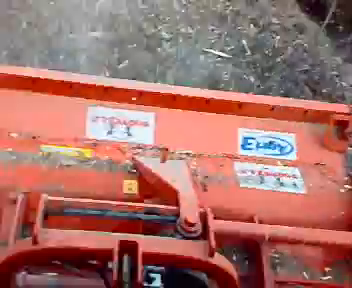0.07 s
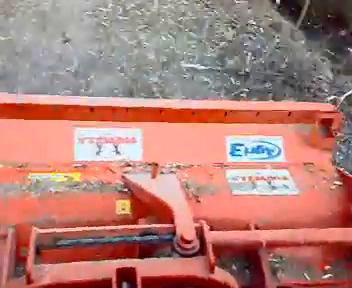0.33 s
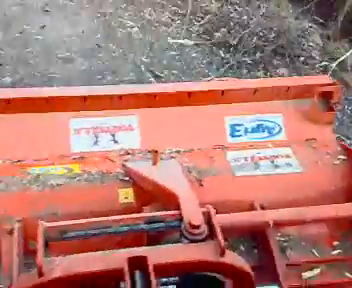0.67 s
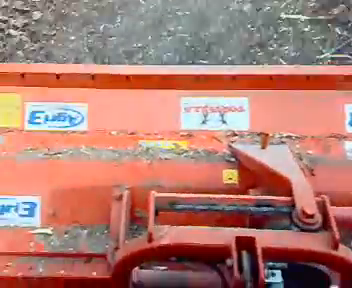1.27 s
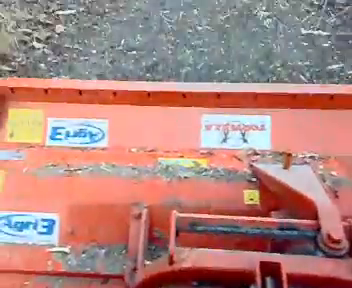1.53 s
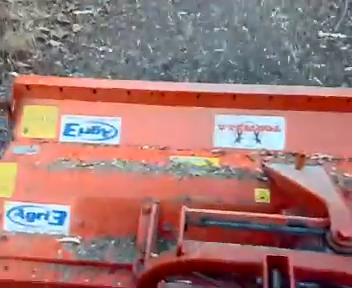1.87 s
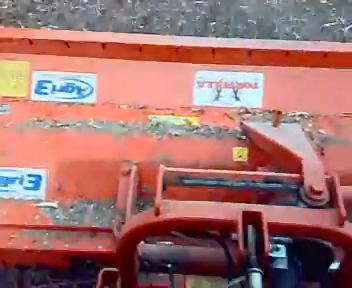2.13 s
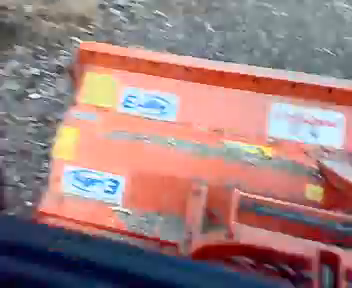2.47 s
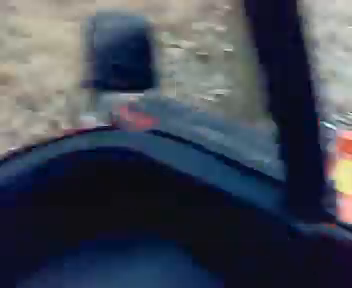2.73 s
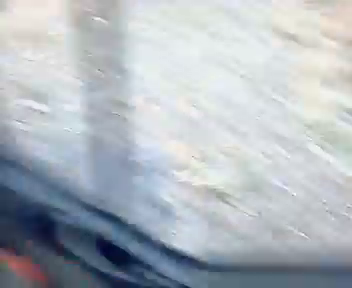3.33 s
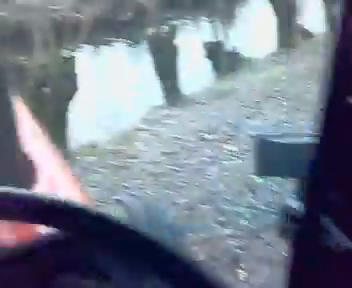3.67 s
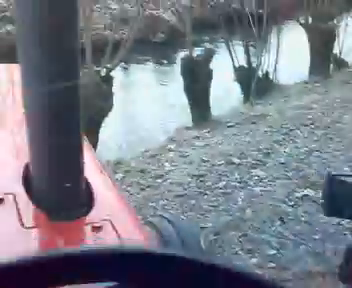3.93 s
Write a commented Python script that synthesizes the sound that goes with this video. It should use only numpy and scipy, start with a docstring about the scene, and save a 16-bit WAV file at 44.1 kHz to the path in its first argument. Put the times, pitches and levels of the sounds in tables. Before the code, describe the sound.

Heard inside a tractor cab, a flail mulcher shreds wood with harsh crunches, cracks and a hail of chips on steel, above the steady diesel engine. Toward the end the mulcher recedes and the engine's deep hum grows.

```python
"""In the cab of a tractor driving a flail mulcher through cut branches.
The rotor's flails drone over the diesel engine while a hail of chips rattles the steel hood.
Thick limbs are chopped, branches snap, chunks ping, a branch knocks and one flail rings.
Near the end the mulcher fades and the cab boom swells as the microphone turns into the cab.
The loud stretches overload it."""
import sys
import numpy as np
from scipy import signal
from scipy.fft import rfft, irfft
from scipy.io import wavfile
from scipy.ndimage import uniform_filter1d

SR = 44100
rng = np.random.default_rng(int(sys.argv[2]) if len(sys.argv) > 2 else 0)


def log_audio(samples):
    """Write samples as a 16-bit WAV file to the path given in sys.argv[1]."""
    # one column per channel
    frames = np.atleast_2d(samples).T
    # limit to full scale, then quantise
    limited = np.clip(frames, -1, 1)
    pcm = np.round(limited * 32767).astype(np.int16)
    wavfile.write(sys.argv[1], SR, pcm)


N = 176400
T = np.arange(N) / SR

# rotor speed, sagging under load (time [s], speed [turns/s])
ROTOR_SPEED = [(0, 32.19), (0.3, 32.39), (0.6, 32.74), (0.9, 32.87), (1.7, 33.06), (1.84, 32.47),
               (1.95, 32.79), (2.08, 32.71), (2.5, 33.05), (3.0, 33.37), (3.35, 33.34), (3.65, 33.63)]
# drone of the flails (time [s], flail-passing tone [dB], its octave [dB])
DRONE_LEVELS = [(0, -14.5, -21), (.11, -18, -22), (.2, -15.5, -16.5), (.44, -14.5, -18), (.6, -12.3, -12),
                (1.2, -12.8, -12.7), (1.47, -11, -13.3), (1.8, -13.2, -12.3), (2.0, -11.3, -12.5),
                (2.45, -10.3, -11), (2.72, -12.2, -13.2), (2.85, -11, -21), (3.05, -11, -26),
                (3.25, -20, -27), (3.65, -18.5, -38), (3.8, -30, -29), (4, -34, -34)]
# colour of the air churned by the rotor (frequency [Hz], relative level [dB])
CHURN_COLOUR = [(20, -20), (60, -16), (120, 0.5), (160, -6.5), (260, -4), (340, 3.5), (600, -3.5),
                (1300, -4.5), (2400, -12.5), (7500, -19)]
# fader of the churning air (time [s], level [dB])
CHURN_LEVEL = [(0, -18), (2.2, -14), (2.7, -15.5), (3.2, -22), (4, -30.5)]
# colour of the engine in the cab (frequency [Hz], relative level [dB])
ENGINE_COLOUR = [(25, -17), (60, -2.5), (125, 1), (220, -1), (315, -7.5), (420, -11), (520, -15),
                 (670, -6.5), (900, -11), (1300, -9.5), (1900, -14.5), (2400, -24.5), (5000, -28.5),
                 (7500, -36)]
# cab boom at crankshaft speed (time [s], level [dB])
BOOM_LEVEL = [(0, -31), (2.3, -37.5), (2.8, -28.5), (3.3, -25), (3.6, -18.5), (4, -21)]
# strong engine orders (pitch [x crankshaft speed], level [dB])
ENGINE_ORDERS = [(3, -32.5), (3.5, -33.5), (4, -35), (6.75, -33), (9, -39.5), (9.5, -35.5)]
# gear whines (pitch at full speed [Hz], level [dB])
GEAR_WHINES = [(1203, -37), (1270, -34), (654, -38.5), (3400, -45)]
# how hard wood is being shredded (time [s], level [dB])
FEED_LEVEL = [(0, 0), (.05, -8.5), (.1, 2), (.17, -6.5), (.32, -4.5), (.44, -12), (.53, -9.5), (.58, -12.5),
              (.72, -11.5), (.86, -12.5), (.93, -6.5), (1.14, -7.5), (1.39, -8.5), (1.47, -11),
              (1.61, -4.5), (1.73, -7), (1.8, -3), (1.9, -9), (2.05, -14), (2.13, -5.5), (2.3, -13),
              (2.45, -19.5), (2.65, -21), (3.1, -23), (3.5, -32)]
# colour of the steel hood rattled by chips (frequency [Hz], relative level [dB])
HOOD_COLOUR = [(150, -14), (400, -2), (800, -4), (1100, -3), (1400, -1), (1900, 4.5), (2400, -4.5),
               (3300, -4), (4200, -4.5), (5200, -2), (6300, -6.5), (7500, -10.5)]
# treble shelf on the shredding (time [s], gain [dB])
TREBLE_SHELF = [(0.28, 2), (.45, 1.5), (1.6, 0.5), (2.4, 0), (3, -10)]
# narrow resonances of the hood (centre [Hz], half-width [Hz], level against the shredding [dB])
HOOD_RESONANCES = [(1340, 74, -15.5), (1636, 110, -18.5), (3327, 33, -19.5), (5190, 32, -33)]
# thick limbs being chopped (time [s], hold [s], level [dB])
LIMB_CHOPS = [(0.074, 0.048, -1), (1.06, 0.023, -2.5), (1.232, 0.016, -8.5), (1.761, 0.039, -4.5),
              (1.865, 0.066, -7), (2.108, 0.043, -10)]
# colour of a chop (frequency [Hz], relative level [dB])
CHOP_COLOUR = [(300, -17.5), (850, -5.5), (1150, -5), (1680, 2.5), (2000, 3), (2450, -6), (5500, -13),
               (7500, -21.5)]
# branches snapping (time [s], level [dB], t60 [s], tilt above 2 kHz [dB/octave])
BRANCH_CRACKS = [(0.41, -2, 0.088, 5.5), (0.4765, 1, 0.1, -1), (.518, -2.5, 0.18, 3.5),
                 (.617, -3, 0.051, 4), (0.7047, -3, 0.049, 7), (.8919, -6.5, .1, -12),
                 (1.2328, -2, 0.11, -1), (2.071, -3, 0.08, -6.5), (2.115, -5.5, .1, 1),
                 (2.2153, -5, 0.082, -2), (2.333, -5, 0.15, 2.5), (2.363, -2.5, 0.071, 3),
                 (2.488, -15, 0.32, 2), (2.6022, -8.5, 0.21, -2), (2.729, -10, 0.24, -1),
                 (2.791, -2, 0.084, 2), (2.9388, -14.5, 0.11, 1), (2.9608, -5, 0.045, 0),
                 (3.2121, -15, 0.078, -0.5), (3.365, -12.5, 0.11, -3)]
# colour of a crack before its tilt (frequency [Hz], relative level [dB])
CRACK_COLOUR = [(80, -36.5), (400, -6.5), (900, -5), (1800, 2.5), (2500, -3.5), (5000, -1), (7500, -13.5)]
# modes of the hood under a heavy branch (pitch [Hz], level [dB], t60 [s])
KNOCK_MODES = [(885, -5, 0.077), (980, -6, 0.12), (1253, -12, .12)]
# modes of a ringing flail (pitch [Hz], level [dB], t60 [s])
FLAIL_MODES = [(2954, -12, 0.19), (4750, -9.5, 0.22), (6240, -9, 0.12)]
# hard chunks pinging on the steel (time [s], pitch [Hz], level [dB])
CHUNK_PINGS = [(1.065, 3120, -10), (1.172, 3464, -14), (1.229, 5150, -7.5), (1.786, 3310, -6.5),
               (1.89, 1893, -10.5)]
# treble roll-off on the whole mix (frequency [Hz], gain [dB])
TREBLE_ROLL_OFF = [(7200, 0.5), (7600, -7.5), (8000, -22), (8600, -20)]

FLAILS, ENGINE_CYCLES_PER_TURN = 6, .5205


def amp(db):
    """Decibels to gain."""
    return 10 ** (np.asarray(db) / 20)


def unit(x):
    """Scales to rms 1."""
    return x / np.sqrt(np.mean(x ** 2) + 1e-20)


def curve(rows, column=1):
    """One column of a time table at every sample."""
    rows = np.array(rows)
    return np.interp(T, rows[:, 0], rows[:, column])


def colour(x, points):
    """Shapes a sound with an EQ curve; rms 1."""
    f, db = np.transpose(points)
    hz = np.fft.rfftfreq(len(x), 1 / SR)
    gain = amp(np.interp(np.log(hz + 1), np.log(f), db))
    return unit(irfft(rfft(x) * gain, len(x)))


def wander(rate_hz):
    """Smooth random drift of rms 1."""
    lowpass = np.exp(-(np.fft.rfftfreq(N, 1 / SR) / rate_hz) ** 2)
    return unit(irfft(rfft(rng.standard_normal(N)) * lowpass, N))


def patchy(depth_db, size=512):
    """Noise whose level drifts in patches of time and frequency."""
    noise = signal.stft(rng.standard_normal(N), nperseg=size)[2]
    bands = uniform_filter1d(rng.standard_normal(noise.shape), size=5, axis=0)
    patches = unit(uniform_filter1d(bands, size=6, axis=1))
    return unit(signal.istft(noise * amp(depth_db * patches), nperseg=size)[1][:N])


def add(mix, s, sound):
    """Mixes a sound in at s seconds."""
    part = mix[max(round(s * SR), 0):][:len(sound)]
    part += sound[:len(part)]


def decay(t, t60):
    """A tail that falls 60 dB in t60 seconds."""
    return np.exp(-np.log(1000) * t / t60)


def rotor(turns, waver_db=1.45):
    """Flails sweep past the hood: a wavering tone, its firm octave and churning air."""
    sweep = 2 * np.pi * FLAILS * turns
    tone = amp(curve(DRONE_LEVELS) + waver_db * wander(24)) * np.sin(sweep)
    octave = amp(curve(DRONE_LEVELS, column=2)) * np.sin(2 * sweep)
    air = amp(curve(CHURN_LEVEL)) * colour(patchy(depth_db=2), CHURN_COLOUR)
    return tone + octave + air


def engine(cycles, cylinders=4, growl_db=-23.5, clatter_db=-24.5, size=2520):
    """The diesel repeats one growl per cycle and clatters at each firing, over cab boom and orders."""
    pattern = np.interp(cycles % 1, np.arange(size) / size, rng.standard_normal(size))
    firing = .5 + np.exp(-(cylinders * cycles % 1))
    growl = amp(growl_db) * colour(pattern * firing, ENGINE_COLOUR)
    clatter = amp(clatter_db) * colour(rng.standard_normal(N) * firing, ENGINE_COLOUR)
    crank = 2 * np.pi * 2 * cycles  # two crankshaft turns per cycle
    boom = amp(curve(BOOM_LEVEL) + wander(8)) * np.sin(crank)
    out = growl + clatter + boom
    for order, db in ENGINE_ORDERS:
        peak = np.sqrt(2) * amp(db + 2 * wander(7.3))
        out += peak * np.sin(order * crank + 2 * np.pi * rng.random())
    return out


def gear_whine(cycles):
    """Gears sing thin, fluttering tones that follow the engine speed."""
    full_speed = (cycles[-1] - cycles[-2]) * SR
    out = np.zeros(N)
    for hz, db in GEAR_WHINES:
        peak = np.sqrt(2) * amp(db + 2 * wander(10))
        out += peak * np.sin(2 * np.pi * hz * cycles / full_speed + 1.03 * wander(27))
    return out


def shredding(chips_per_s=1500, spread_db=5.5, chip_share=.56, shelf_hz=3000, patches=24, size=2048):
    """A hail of chips, each ringing a patch of the hood, over the hiss of tearing wood."""
    strength = amp(spread_db * np.minimum(rng.exponential(1, N), 5))
    hits = strength * (rng.random(N) < chips_per_s / SR)
    patch_hit = rng.integers(0, patches, N)
    chips = np.zeros(N)
    for patch in range(patches):
        ring = rng.standard_normal(size) * decay(T[:size], t60=.029)
        chips += signal.oaconvolve(hits * (patch_hit == patch), ring)[:N]
    hiss = patchy(depth_db=3.5)
    spray = colour(np.sqrt(chip_share) * unit(chips) + np.sqrt(1 - chip_share) * hiss, HOOD_COLOUR)
    treble = signal.sosfiltfilt(signal.butter(2, shelf_hz, "high", fs=SR, output="sos"), spray)
    return amp(curve(FEED_LEVEL)) * (spray + (amp(curve(TREBLE_SHELF)) - 1) * treble)


def ping(hz, db, hold_s=0, detune=.0319, size=8192):
    """One spot of steel rings as a mode with two close neighbours, held and then dying away."""
    t = T[:size]
    ring = np.sin(2 * np.pi * hz * t)
    for side in (-1, 1):
        neighbour_hz = hz * (1 + side * detune * rng.random())
        ring += .5 * np.sin(2 * np.pi * (neighbour_hz * t + rng.random()))
    return amp(db) * decay(np.maximum(t - hold_s, 0), t60=.086) * ring


def singing_hood(pings_per_s=30, count=200):
    """The hood sings under the hail of chips: small pings and narrow resonances ride the feed."""
    out = np.zeros(N)
    for when, pitch, strength in rng.random((count, 3)):
        add(out, when * count / pings_per_s, ping(hz=1200 * 5.5 ** pitch, db=-18 + 8 * strength))
    hz = np.fft.rfftfreq(N, 1 / SR)
    for centre, half_width, db in HOOD_RESONANCES:
        resonance = 1 / (1 + ((hz - centre) / half_width) ** 2)
        out += amp(db) * unit(irfft(rfft(rng.standard_normal(N)) * resonance, N))
    return out * amp(curve(FEED_LEVEL))


def chops(turns, attack_s=.0037, bite_db=7.5, size=8192):
    """Flail after flail bites into a thick limb, driving the hood's main resonance in a rough surge."""
    t, out = T[:size], np.zeros(N)
    for s, hold_s, db in LIMB_CHOPS:
        swell = np.minimum(t / attack_s, 1) * decay(np.maximum(t - hold_s, 0), t60=.085)
        add(out, s, amp(db) * swell * colour(rng.standard_normal(size), CHOP_COLOUR))
    bites = unit(amp(-bite_db * (FLAILS * turns % 1)))  # the level falls between flails
    return out * bites


def cracks(attack_s=.00066, splinter_db=1, size=8192):
    """Branches snap in short splintering bursts, dull or bright."""
    t, out = T[:size], np.zeros(N)
    for s, db, t60, tilt in BRANCH_CRACKS:
        tilted = [(hz, level + tilt * np.log2(max(hz / 2000, 1))) for hz, level in CRACK_COLOUR]
        snap = np.minimum(t / attack_s, 1) * decay(t, t60)
        add(out, s, amp(db) * snap * colour(rng.standard_normal(size), tilted))
    return out * amp(splinter_db * wander(320))


def struck_steel(modes, at_s):
    """One blow sets the hood or a flail ringing in its modes."""
    t, out = T[:SR // 2], np.zeros(N)
    for hz, db, t60 in modes:
        add(out, at_s, amp(db) * decay(t, t60) * np.sin(2 * np.pi * hz * t))
    return out


def chunk_pings(grind_cycles=55.5):
    """Hard chunks ping on the steel, each note held while the chunk grinds on it."""
    out = np.zeros(N)
    for s, hz, db in CHUNK_PINGS:
        add(out, s, ping(hz, db, hold_s=grind_cycles / hz))
    return out


def scene():
    """Engine and rotor, geared together, lay a bed for the wood and steel; mono on both channels."""
    turns = np.cumsum(curve(ROTOR_SPEED)) / SR
    cycles = turns * ENGINE_CYCLES_PER_TURN
    machine = rotor(turns) + engine(cycles) + gear_whine(cycles)
    debris = shredding() + singing_hood() + chunk_pings() + chops(turns) + cracks()
    blows = struck_steel(KNOCK_MODES, at_s=.478) + struck_steel(FLAIL_MODES, at_s=.748)
    mono = machine + debris + blows
    return np.array([mono, mono])


def record(dry, threshold=1.5, release_db_per_s=4002, ceiling=.66, knee=3.4, edge_hz=8900):
    """Overload crunch: a very fast limiter and a soft clip, then treble roll-off and band limit."""
    lowpass = signal.firwin(201, edge_hz, window=("kaiser", 7), fs=SR)[None]
    x = signal.oaconvolve(dry, lowpass, "same")
    release = T * release_db_per_s
    over_db = np.maximum(20 * np.log10(abs(x[0]) / threshold + 1e-9), 0)
    limited = x / amp(np.maximum.accumulate(over_db + release) - release)
    clipped = limited / (1 + abs(limited / ceiling) ** knee) ** (1 / knee)
    roll_off = amp(np.interp(np.fft.rfftfreq(2 * N, 1 / SR), *np.transpose(TREBLE_ROLL_OFF)))
    dulled = irfft(rfft(clipped, 2 * N) * roll_off)[:, :N]
    return signal.oaconvolve(dulled, lowpass, "same")


dry = scene()
out = record(dry)
log_audio(out)
```